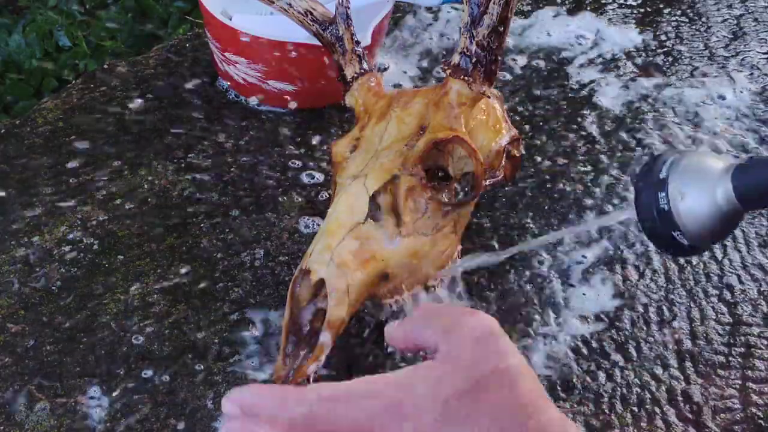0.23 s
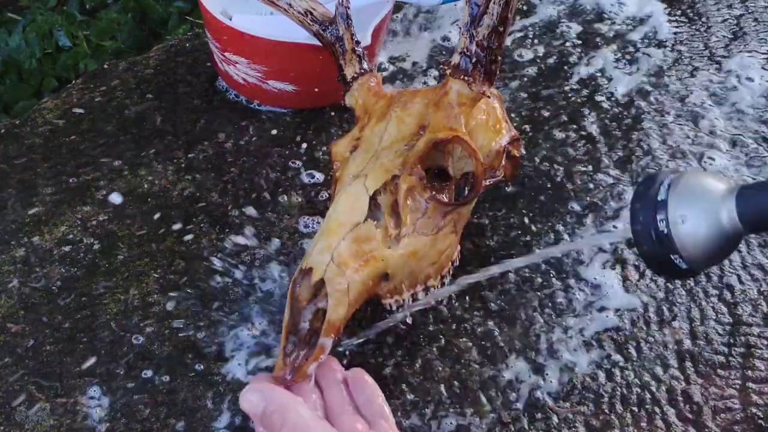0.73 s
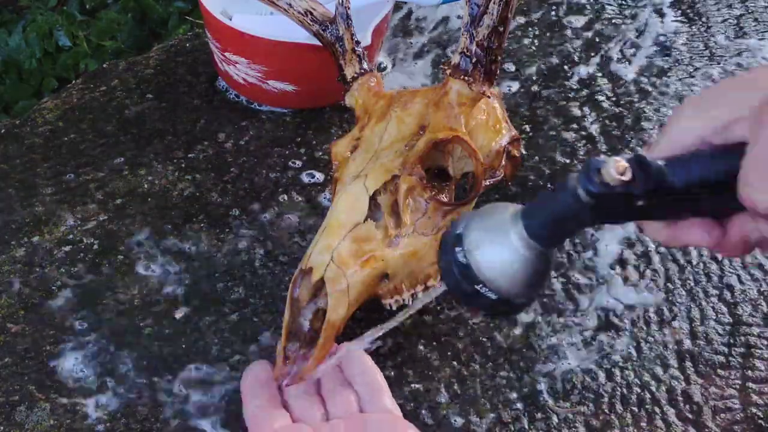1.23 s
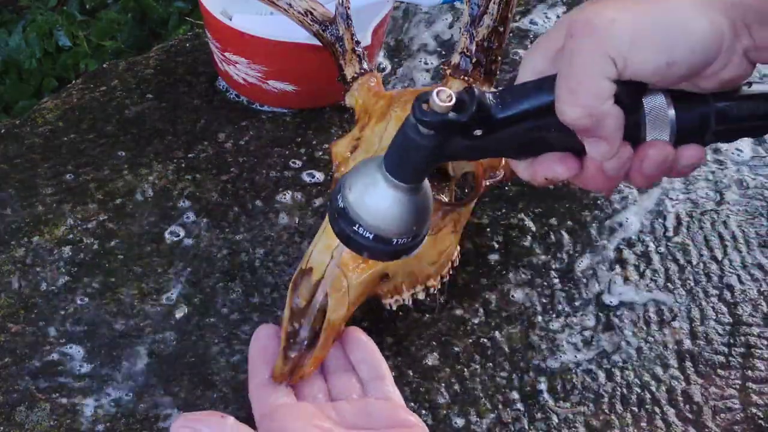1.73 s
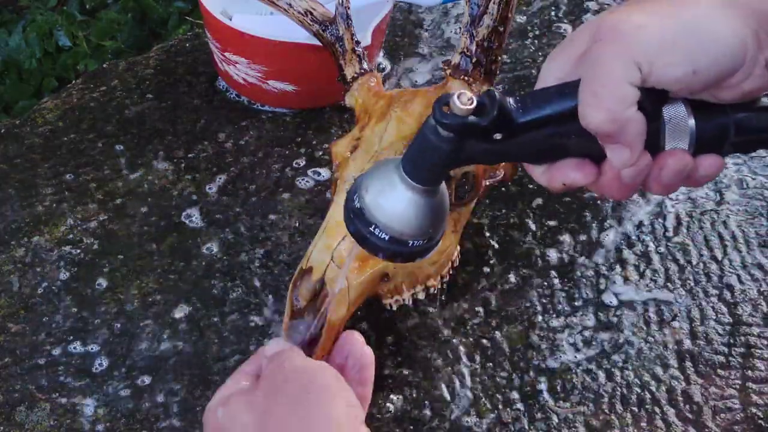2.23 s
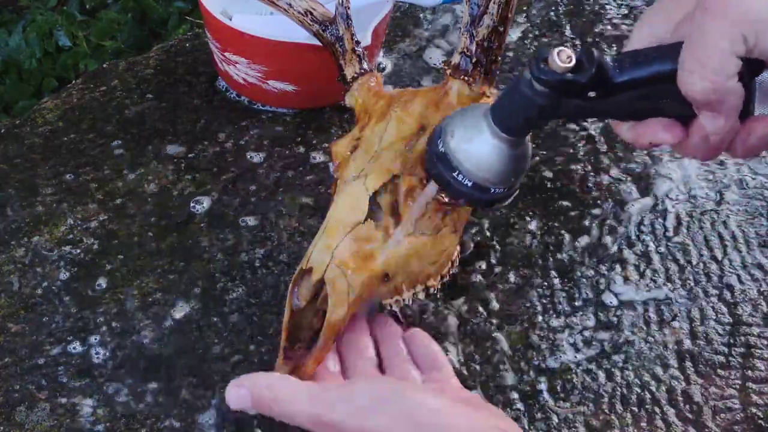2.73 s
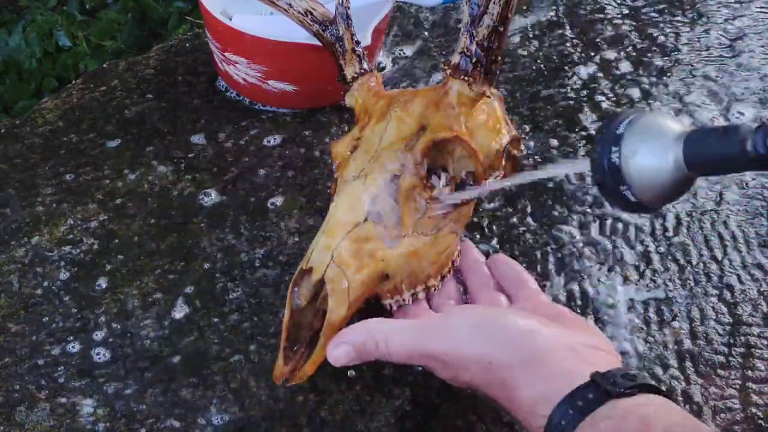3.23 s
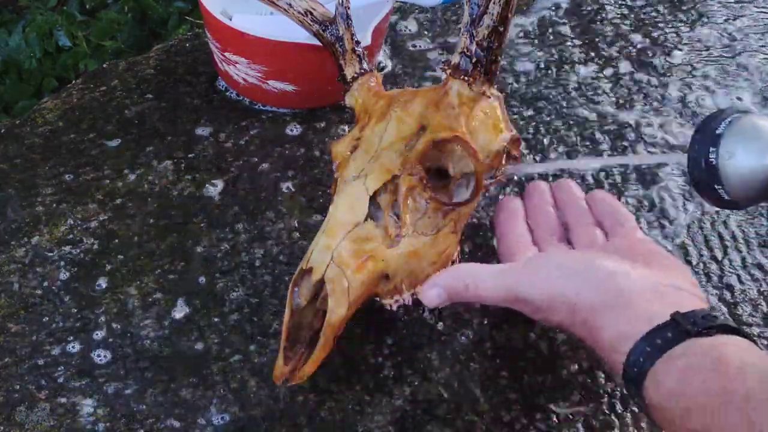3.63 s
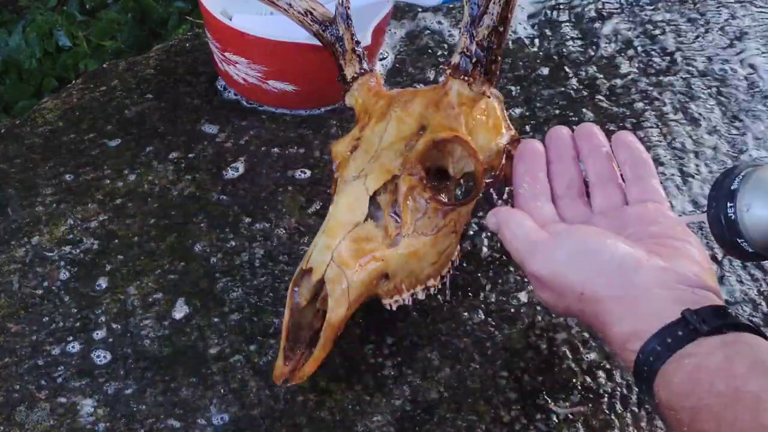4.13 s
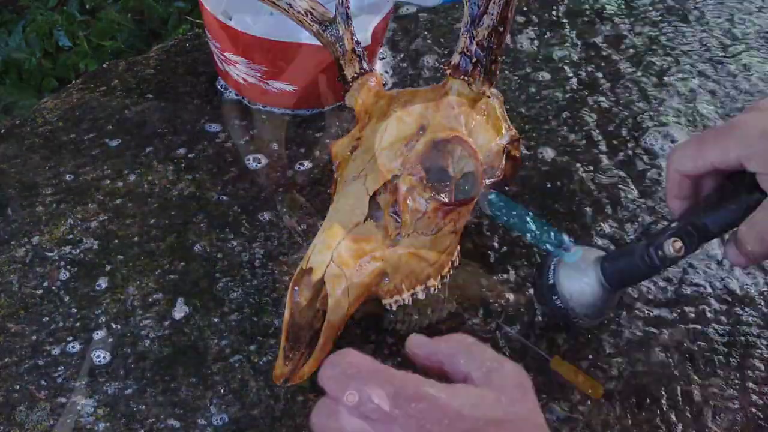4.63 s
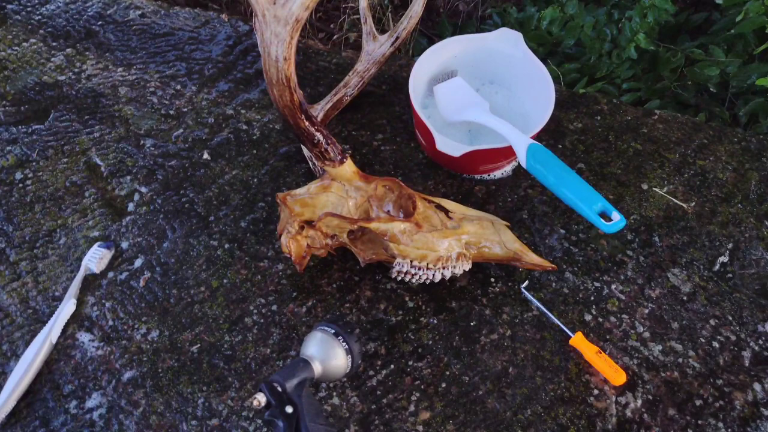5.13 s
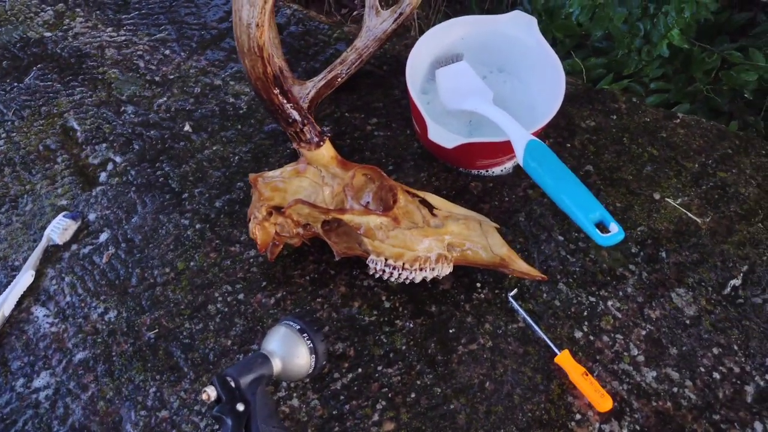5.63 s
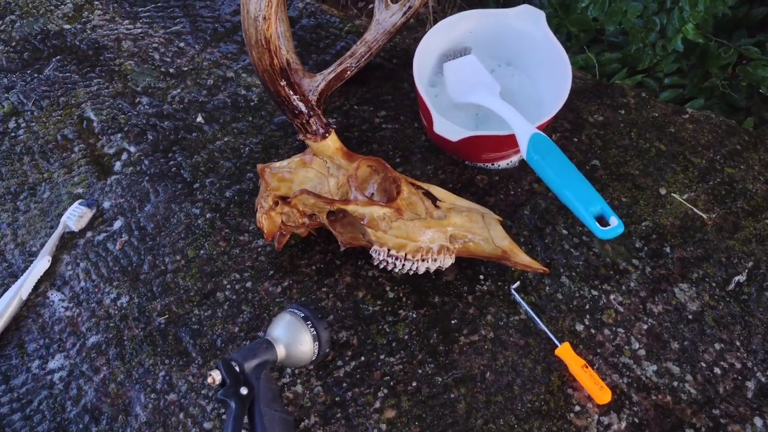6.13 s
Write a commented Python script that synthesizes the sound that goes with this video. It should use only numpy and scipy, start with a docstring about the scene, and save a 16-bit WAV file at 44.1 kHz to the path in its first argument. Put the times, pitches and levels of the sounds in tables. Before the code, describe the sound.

Close, fizzy water spray patters on concrete and an animal skull, surging now and then with small hollow gurgles and sharp drips. The spray grows briefly louder, thins and fades out a little past four seconds. A shrill chorus of cicadas then rises in the yard and carries on to the end, with faint knocks, rustling and low thumps from fingers on the microphone.

```python
"""In a yard, a hose jet rinses a deer skull on a concrete slab.
Drops hiss on the stone, slap the bone and drum in the skull's hollows; trapped air rings as bubbles.
The water fades out after four seconds and cicadas swell in the trees, their tymbals pulsing
their resonant bodies. Fingers on the hand-held microphone add soft bumps and a low rumble."""
import sys
import numpy as np
from scipy import signal
from scipy.fft import rfft, irfft
from scipy.io import wavfile
from scipy.ndimage import map_coordinates

SR = 44100
rng = np.random.default_rng(int(sys.argv[2]) if len(sys.argv) > 2 else 0)


def to_wav(s):
    """Save 16-bit WAV."""
    ch = np.atleast_2d(s).T  # columns
    pcm = np.round(np.clip(ch, -1, 1) * 32767)  # PCM
    wavfile.write(sys.argv[1], SR, pcm.astype(np.int16))


N = 281005
TIME = np.arange(N) / SR


def undb(db):
    """Decibels to gain."""
    return 10 ** (np.asarray(db) / 20)


def unit(x):
    """Scale to rms 1."""
    return x / np.sqrt(np.mean(x ** 2))


def curves(table):
    """One automation curve for each column after the time."""
    times, *columns = np.transpose(table)
    return [np.interp(TIME, times, column) for column in columns]


def panned(pan_db):
    """Stereo gains; pan is left minus right."""
    return undb(np.array([[.5], [-.5]]) * pan_db)


def walk(rate):
    """Random modulator with spread near 1 that turns rate times a second."""
    points = rng.standard_normal(N // 8)
    return np.sqrt(3 / 2) * np.interp(TIME * rate, np.arange(len(points)), points)


def swell(middle_s, length_s):
    """A bell envelope, peak 1, half as high at the ends of its length."""
    return .5 ** np.minimum((2 * (TIME - middle_s) / length_s) ** 2, 40)


def add(out, s, sound):
    """Mix a one-shot in at time s."""
    start = max(int(s * SR), 0)
    out[:, start:start + sound.shape[-1]] += sound[..., :max(N - start, 0)]


def equalise(x, points):
    """Minimum-phase EQ through points of (frequency [Hz], gain [dB])."""
    size = 2048
    hz, db = np.transpose(points)
    shape_db = np.interp(np.log(np.arange(size // 2 + 1) * SR / size + 1), np.log(hz), db)
    cepstrum = irfft(np.log(undb(shape_db)))
    cepstrum[1:size // 2] *= 2
    cepstrum[size // 2 + 1:] = 0
    impulse = irfft(np.exp(rfft(cepstrum)))
    return signal.oaconvolve(np.atleast_2d(x), impulse[None], axes=1)[:, :N]


def colour(x, points):
    """EQ a sound and scale it to rms 1."""
    return unit(equalise(x, points))


def resonate(x, hz, width):
    """One resonance, gain 1 at its centre."""
    return signal.lfilter(*signal.iirpeak(min(hz, SR * .45), hz / width, fs=SR), x)


def ring(x, modes):
    """A body with several resonances, at rms 1."""
    return unit(sum(undb(db) * resonate(x, hz, width) for hz, width, db in modes))


def delayed(x, lag_ms):
    """Delay one channel; the lag may move."""
    return map_coordinates(x, [np.arange(N) - lag_ms * SR / 1000], order=3)


def bounce(x, lag_ms, gain, sway_ms):
    """A hard surface adds an echo whose lag drifts at each ear and colours the sound."""
    echo = np.array([delayed(ear, lag_ms + sway_ms * walk(rate=2.5)) for ear in x])
    return (x + gain * echo) / np.hypot(1, gain)


def impacts(rate, spread_db, lag_ms, focus, clump_db):
    """Clumped clicks of random size; a share (focus) is centred, the rest lag between the ears."""
    hits = np.flatnonzero(rng.random(N) < rate / SR)
    size_db = spread_db * np.minimum(rng.exponential(size=N), 5) + clump_db * walk(rate=500)
    size = undb(size_db) * rng.choice([-1, 1], N)
    place = rng.standard_normal(N) * (rng.random(N) > focus)
    lag = np.round(place[hits] * lag_ms * SR / 1000).astype(int)
    return np.array([np.bincount(at, size[hits], N) for at in (hits, (hits + lag) % N)])


def burst(hz, width, decay_s):
    """A short crack of noise in a broad resonance, peak 1."""
    t = TIME[:2048]
    crack = resonate(rng.standard_normal((2, len(t))) * np.exp(-t / decay_s), hz, width)
    return crack / np.abs(crack).max(axis=1, keepdims=True)


def bubble(hz, t60, glide=0.063):
    """Trapped air rings and rises in pitch as it nears the surface."""
    t = np.arange(int(t60 * SR) + 2) / SR
    phase = 2 * np.pi * hz * (t + glide * t ** 2 / (2 * t60))
    return np.exp(-np.log(1000) * t / t60) * np.sin(phase)


# tone of the outdoor bed: (frequency [Hz], gain [dB])
AIR_EQ = [(30, -18.5), (100, 6), (250, -3.5), (500, -3), (900, -9), (1400, -8), (2400, -7.5), (6000, 0.5),
          (16000, -23)]
# fader of the far drone: (time [s], level [dB])
DRONE_FADER = [(5.3, -92), (5.6, -72), (6.0, -67), (6.37, -79)]
def yard():
    """A bed of still air, and a far drone that swells near the end."""
    air = colour(rng.standard_normal(N) + 0.95 * rng.standard_normal((2, N)), AIR_EQ)
    air *= undb(-62.5 + walk(rate=9.1))
    drone_eq = [(150, -25), (290, 2.5), (370, 4.5), (470, -14.5), (900, -37)]
    drone = colour(rng.standard_normal(N) + 0.14 * rng.standard_normal((2, N)), drone_eq)
    return air + drone * undb(curves(DRONE_FADER)[0])


# ride of the handling rumble: (time [s], relative level [dB], pan [dB])
RUMBLE_FADER = [(0, -76, 6), (.6, -89, 0), (1.25, -81.5, 1), (1.75, -69, -9), (2.05, -76.5, -6),
                (2.2, -70.5, 13), (2.75, -63.5, 0), (3.0, -73, -2), (3.7, -70.5, -1.5), (4.6, -85.5, 8),
                (5.1, -80, -6), (5.65, -69.5, -15), (6.37, -74.5, -1)]
# its bass-heavy tone: (frequency [Hz], gain [dB])
RUMBLE_EQ = [(20, -37), (45, -8), (75, 5.5), (120, -1), (200, -18), (400, -28), (1500, -66), (8000, -72)]
# rustle of the moving hand: (time [s], level [dB])
RUSTLE_FADER = [(4.93, -95), (5.04, -63.5), (5.12, -75), (5.3, -72), (5.42, -71.5), (5.75, -73.5),
                (6.1, -91)]
# soft thumps on the microphone: (time [s], level [dB], pitch [Hz], pan [dB])
BUMP_CUES = [(0.075, -48.5, 106, 23), (2.178, -53, 95, 26), (2.219, -53, 96, 16), (2.251, -51, 90, 14),
             (2.347, -51.5, 79, 22), (2.491, -49, 91, 18), (2.526, -49.5, 90, 10), (2.737, -48.5, 81, 18),
             (2.765, -49, 70, 15), (2.825, -51, 87, 10), (3.27, -55, 99, 17), (3.361, -46.5, 79.6, 17),
             (5.226, -45, 122, -24), (5.458, -50, 108, -25), (5.634, -55, 79, -15), (5.876, -55, 84, -20)]
def handling(attack_s=0.0062):
    """Fingers shift on the microphone's body: a rumble, a faint rustle and bumps of a few cycles."""
    rumble_db, rumble_pan = curves(RUMBLE_FADER)
    rumble = colour(rng.standard_normal((2, N)), RUMBLE_EQ)
    rumble *= undb(rumble_db + 6.5 + 2.8 * walk(rate=28)) * panned(rumble_pan)
    rub_eq = [(300, -11.5), (750, -7), (920, 1), (1150, -8), (2200, -8.5), (4000, -32), (12000, -48)]
    rub = colour(impacts(rate=1800, spread_db=3.5, lag_ms=0.17, focus=0.33, clump_db=0.5), rub_eq)
    out = rumble + rub * undb(curves(RUSTLE_FADER)[0] + 2 * walk(rate=36))
    t = TIME[:SR // 10]
    press = (t / attack_s * np.exp(1 - t / attack_s)) ** 2
    for s, db, hz, pan_db in BUMP_CUES:
        add(out, s, undb(db) * panned(pan_db) * press * np.sin(2 * np.pi * hz * t))
    return out


# taps and scuffs: (time [s], relative level [dB], centre [Hz], decay [s])
TAP_CUES = [(4.873, -60.5, 400, 0.0057), (5.022, -49, 1600, 0.0013), (5.146, -59, 1100, 0.0035),
            (5.202, -41, 950, .001), (5.314, -55, 780, 0.0058), (5.366, -54.5, 865, 0.0046),
            (5.572, -45, 695, 0.0013)]
def taps():
    """Light dull knocks near the microphone."""
    out = np.zeros((2, N))
    for s, db, hz, decay_s in TAP_CUES:
        knock = burst(hz, 1.2 * hz, decay_s)[0]
        add(out, s, undb(db + 3) * resonate(knock, hz, width=1.9 * hz))
    return out


def cicada(click_hz, depth, eq, modes, ring_db, flutter_db):
    """Buckling tymbals pulse the body's resonances; the trees smear the pulses into wide noise."""
    phase = 2 * np.pi * np.cumsum(click_hz * (1 + 0.0057 * walk(rate=3.7))) / SR
    pulses = rng.standard_normal((2, N)) * np.exp(depth * np.cos(phase))
    song = unit(colour(pulses, eq) + undb(ring_db) * colour(ring(pulses, modes), eq))
    return song * undb(flutter_db * walk(rate=40))


# balance of the cicadas: (time [s], far chorus [dB], shrill singer [dB], lower singer [dB])
CICADA_FADERS = [(4.4, -57, -61, -60), (4.67, -51.5, -52.5, -60), (4.92, -54, -47.5, -56.5),
                 (5.22, -51, -44, -53), (5.45, -54.5, -44, -47.5), (5.72, -53.5, -44, -46.5),
                 (5.95, -57, -47, -45.5), (6.2, -54, -46.5, -46), (6.37, -55, -46.5, -47.5)]
# broad tone of each voice: (frequency [Hz], gain [dB])
FAR_EQ = [(2500, -24.5), (4000, -17.5), (5000, -5.5), (6900, 0), (7300, 1), (7880, 3.5), (8050, -8.5),
          (8600, -6.5), (9000, -7), (9450, -5), (10200, -21.5), (12000, -19), (13000, -26), (16000, -31)]
SHRILL_EQ = [(2400, -36), (2850, -18.5), (3080, -17), (3350, -8.5), (3800, -26.5), (5850, -8), (6000, 2.5),
             (6570, -1), (6800, -5), (7600, -43.5)]
LOWER_EQ = [(1500, -42), (2500, -23), (2850, -4), (3100, -14), (3500, -4), (3880, -4), (4030, 1),
            (4300, 1.5), (4750, 0.5), (5350, 1), (5800, -4.5), (7000, -35)]
# sharp body resonances: (centre [Hz], width [Hz], gain [dB])
FAR_PEAKS = [(7406, 56, 0), (8040, 70, -1)]
SHRILL_PEAKS = [(6110, 27, -3), (6250, 7.6, 2), (6520, 85, -2.5), (6350, 60, -32)]
LOWER_PEAKS = [(3986, 45, -6.5), (4620, 45, -4), (4570, 41, -6), (4810, 35, -7), (4866, 49, 1.5),
               (5400, 57, -9), (5130, 69, -6)]
def cicadas():
    """A far chorus hisses; a shrill singer swells over it, then a lower one; a house wall echoes them."""
    far_db, shrill_db, lower_db = curves(CICADA_FADERS)
    far = cicada(click_hz=262, depth=0.068, eq=FAR_EQ, modes=FAR_PEAKS, ring_db=-8.5, flutter_db=0.44)
    shrill = cicada(click_hz=220, depth=0.24, eq=SHRILL_EQ, modes=SHRILL_PEAKS,
                    ring_db=-4, flutter_db=-0.5)
    lower = cicada(click_hz=175, depth=0.077, eq=LOWER_EQ, modes=LOWER_PEAKS, ring_db=-7, flutter_db=0)
    song = far * undb(far_db + 4.5) * panned(3.7)
    song += shrill * undb(shrill_db + 2) + lower * undb(lower_db + 1.5)
    fade_in = np.clip((TIME - 4.3) / 0.11, 0, 1)
    return fade_in * bounce(song, lag_ms=11.5, gain=0.42, sway_ms=0.027)


def swish(start_s=2.06, length_s=.125, from_hz=3100, to_hz=2250, db=-50, count=70):
    """The jet slides into a crevice and churns up ever larger bubbles: a short falling swish."""
    out = np.zeros((2, N))
    for along, (detune, size_db) in zip(rng.random(count), rng.standard_normal((count, 2))):
        hz = (from_hz + along * (to_hz - from_hz)) * np.exp(0.081 * detune)
        add(out, start_s + along * length_s, undb(db + size_db) * bubble(hz, t60=0.0082))
    return out


# trapped air and drips: (time [s], level [dB], pitch [Hz], 60 dB decay [s])
PLOP_CUES = [(.046, -45, 700, 0.055), (.056, -43, 599, 0.12), (.100, -39.5, 1000, .018),
             (.312, -47, 1750, 0.022), (.316, -39.5, 2120, 0.012), (.548, -48, 980, 0.048),
             (.811, -44.5, 950, .025), (.990, -45, 2030, .008), (3.490, -39.5, 627, 0.048),
             (3.562, -37, 650, 0.094), (3.574, -43, 552, 0.086), (3.589, -40.5, 775, 0.044),
             (3.773, -42, 3630, 0.029), (4.743, -50.5, 1530, .021)]
def plops():
    """Single air pockets pop in the hollows and puddles."""
    out = np.zeros((2, N))
    for s, db, hz, t60 in PLOP_CUES:
        add(out, s, undb(db) * bubble(hz, t60))
    return out


# bright close drops: (time [s], level [dB], centre [Hz], pan [dB])
SPLAT_CUES = [(.298, -28.5, 9800, 2), (0.306, -26, 11000, 3), (.325, -26.5, 8850, 1), (.789, -25, 14300, 0),
              (.820, -24, 13000, 1), (.821, -30, 6400, -8), (.854, -23, 15000, -12), (.855, -26.5, 6330, 3),
              (1.043, -29, 11000, -4), (1.240, -29, 15000, 1), (1.265, -25, 14600, -2),
              (1.5868, -26.5, 11200, 1), (1.607, -29, 8260, 2), (2.2125, -25.5, 14100, -6),
              (3.5417, -14, 11400, -4), (3.5743, -21, 8300, -6), (3.605, -17, 10200, 0),
              (3.839, -25, 10800, 0), (3.876, -26, 13000, 0), (4.0804, -26, 12300, -12.5)]
# midrange hits on the bone: (time [s], relative level [dB], centre [Hz])
SMACK_CUES = [(0.229, -42, 3770), (.3139, -42.5, 2100), (0.767, -43, 3280), (1.779, -41, 3630),
              (2.0873, -50, 2890), (3.256, -43, 2700), (3.419, -44, 3480), (3.513, -38, 1550),
              (3.5727, -33.5, 3820), (3.588, -40, 5600), (3.606, -36.5, 5670)]
def splats():
    """Single large drops burst on the slab; heavier slugs of water smack the bone."""
    out = np.zeros((2, N))
    for s, db, hz, pan_db in SPLAT_CUES:
        add(out, s, undb(db) * panned(pan_db) * burst(hz, width=1350, decay_s=0.0011))
    for s, db, hz in SMACK_CUES:
        smack = burst(hz, width=890, decay_s=0.0057)[0]
        add(out, s, undb(db) * resonate(smack, hz, width=3000))
    return out


# the nozzle's ring, louder when it is near: (time [s], level [dB])
NOZZLE_FADER = [(0, -70.5), (1.3, -70), (2.2, -72.5), (3.1, -62), (4.1, -65), (4.35, -74.5)]
def nozzle():
    """Running water makes the nozzle sing faintly."""
    flow = impacts(rate=8000, spread_db=-1.5, lag_ms=0.054, focus=0.42, clump_db=2.5)
    return unit(resonate(flow, hz=1422, width=55)) * undb(curves(NOZZLE_FADER)[0])


def fizz(low_hz, high_hz, cycles, spread_db, scatter_db, count):
    """Small bubbles ring all over the wet slab, each at its own pitch and place; rms 1."""
    out = np.zeros((2, N))
    for when, pitch, size, side in rng.random((count, 4)):
        hz = low_hz * (high_hz / low_hz) ** pitch
        db = -spread_db * np.log(max(size, np.exp(-4)))
        gains = undb(db) * panned(scatter_db * (2 * side - 1))
        add(out, when * N / SR, gains * bubble(hz, cycles / hz, glide=0.037))
    return unit(out)


def mist(spray_db):
    """The finest droplets come in spurts of airy sizzle."""
    droplets = impacts(rate=3000, spread_db=3.5, lag_ms=0.17, focus=0.32, clump_db=1.5)
    sizzle = colour(droplets, [(9000, -27), (12000, -5), (15000, 0)])
    return sizzle * undb(spray_db - 6.5 + 4 * walk(rate=18))


def shimmer(x, depth_db, rate):
    """The water film keeps changing shape, so each treble band swells on its own."""
    bands = (resonate(x, hz, width=2000) for hz in (5770, 9200, 12600, 12800))
    return unit(x + sum((undb(depth_db * walk(rate)) - 1) * band for band in bands))


# tone of the bright spray and the fuller splash: (frequency [Hz], gain [dB])
SPRAY_EQ = [(2500, -21.5), (5000, -5), (6200, -5), (7100, -9), (8000, -1), (9000, 2.5), (10500, 3),
            (12500, 2), (14000, 0.5), (15500, 3.5), (17000, -17.5)]
SPLASH_EQ = [(150, -22.5), (400, -4.5), (1000, -17), (2200, -6.5), (3300, 10), (4300, 2.5), (5300, -1),
             (7000, -5), (11000, -12)]
def slab_drops(spray_db, splash_db, flutter):
    """Fine drops hiss and coarse ones splash, echoed by the slab; strays tick near the microphone."""
    fine = impacts(rate=11000, spread_db=2.5, lag_ms=.16, focus=0.38, clump_db=1)
    spray = shimmer(colour(fine, SPRAY_EQ), depth_db=1.4, rate=18) * undb(spray_db + 3)
    coarse = impacts(rate=6400, spread_db=1.5, lag_ms=.16, focus=.45, clump_db=-0.1)
    splash = colour(coarse, SPLASH_EQ) * undb(splash_db + 3)
    hiss = bounce(spray + splash, lag_ms=1.3, gain=0.41, sway_ms=0.114)
    strays = impacts(rate=70, spread_db=3, lag_ms=.15, focus=.3, clump_db=0.5)
    return hiss * flutter + colour(strays, SPRAY_EQ) * undb(spray_db - 8)


# tone of water on bone: (frequency [Hz], gain [dB])
SLAP_EQ = [(300, -15), (700, -16), (1050, 3), (1800, 0), (2500, 1), (4500, -15)]
# air resonances of the eye socket and nose: (centre [Hz], width [Hz], gain [dB])
HOLLOW_PEAKS = [(553, 49, 5), (626, 115, 8), (815, 160, -0.5)]
def skull_drops(drum_db, slap_db):
    """Drops slap the bone and drum on the air in its hollows."""
    on_bone = impacts(rate=1800, spread_db=2.5, lag_ms=0.11, focus=0.57, clump_db=3)
    slap = colour(on_bone, SLAP_EQ) * undb(slap_db - 0.5)
    in_hollows = impacts(rate=900, spread_db=3, lag_ms=0.3, focus=0.5, clump_db=4)
    drum_eq = [(200, -26.5), (380, -7.5), (490, -0.5), (950, -1), (2500, -19.5)]
    return slap + colour(ring(in_hollows, HOLLOW_PEAKS), drum_eq) * undb(drum_db - 2.5)


# slow ride of the jet: (time [s], fine spray [dB], coarse splash [dB], slap on bone [dB])
JET_FADERS = [(0, -49, -60, -63), (.6, -47, -59.5, -64), (1.1, -47.5, -62, -73),
              (1.35, -48.5, -60.5, -66.5), (1.65, -49.5, -64.5, -69), (2.1, -50, -60, -68),
              (2.48, -50, -63, -68), (2.85, -49.5, -59.5, -64), (3.0, -47.5, -58.5, -60),
              (3.4, -48, -59.5, -61), (3.55, -42.5, -57, -54), (3.68, -44, -58, -59),
              (3.86, -45.5, -62, -64), (4.05, -47, -66, -70), (4.18, -49.5, -66, -74),
              (4.35, -51, -65, -78)]
# a sheet of water glances off an edge onto the slab: (middle [s], length [s], splash boost [dB])
SURGE_CUES = [(.31, .04, 2), (0.664, .07, 6), (0.778, 0.063, 6), (1.046, 0.023, 2), (1.325, 0.1, 4.5),
              (1.49, 0.04, 4), (1.803, 0.053, 5.5), (1.896, .09, 4), (2.295, 0.05, 4), (2.376, .04, 4),
              (2.59, 0.06, 1.5), (2.78, 0.033, 1.5), (2.904, 0.046, 5), (3.148, .04, 4.5), (3.25, 0.055, 4),
              (3.333, 0.033, 4), (3.48, 0.088, 3), (3.6, .04, 1.5), (3.827, 0.058, 4.5)]
# the jet catches in a hollow: (middle [s], length [s], drumming [dB], slap [dB])
GUSH_CUES = [(0.06, 0.031, -47, -57.5), (0.112, 0.081, -57, -63), (0.262, 0.087, -61, -70),
             (.347, 0.041, -52, -68), (0.544, 0.015, -51, -59), (.665, 0.071, -59.5, -56),
             (0.766, 0.082, -56.5, -60), (0.968, .035, -54.5, -60.5), (1.183, 0.064, -60, -62),
             (1.899, 0.027, -58.5, -67), (2.21, 0.066, -61.5, -63), (2.917, 0.075, -61, -56),
             (3.27, 0.054, -76, -57), (3.49, 0.075, -52.5, -69), (3.553, 0.05, -64, -48),
             (3.585, 0.029, -37, -46), (3.706, 0.056, -55, -62), (3.834, 0.099, -55, -66.5)]
def jet_levels(spray_share=0.58, slap_share=0.4):
    """Spray, splash, drumming and slap in dB: the jet's slow course with surges and gushes on top."""
    spray_db, splash_db, bone_db = curves(JET_FADERS)
    surge_db = sum(db * swell(s, length) for s, length, db in SURGE_CUES)
    bone_db += slap_share * surge_db
    slap = undb(bone_db)
    drum = undb(bone_db - 4.5)  # the hollows always answer a little to water on the bone
    for s, length, drum_db, slap_db in GUSH_CUES:
        gush = swell(s, length)
        drum = np.hypot(drum, undb(drum_db) * gush)
        slap = np.hypot(slap, undb(slap_db) * gush)
    return spray_db + spray_share * surge_db, splash_db + surge_db, 20 * np.log10(drum), 20 * np.log10(slap)


# where the jet lands in the stereo image: (time [s], left ear's lead [ms])
JET_POSITION = [(0, 0.0071), (1.4, 0.054), (2.7, .058), (3.5, 0), (3.85, -0.019), (4.1, -0.03)]
def aimed(x, pan_db_per_ms=26):
    """The nearer ear hears the jet sooner and louder."""
    lead_ms, = curves(JET_POSITION)
    return np.array([x[0], delayed(x[1], lead_ms)]) * panned(pan_db_per_ms * lead_ms)


# fade-out of the water: (time [s], gain [dB])
JET_FADE_OUT = [(4.345, -0.5), (4.375, -14), (4.5, -20), (5.0, -78)]
def hose_jet():
    """The jet breaks into drops; spray whips up tiny bubbles, water on the bone larger ones."""
    spray_db, splash_db, drum_db, slap_db = jet_levels()
    flutter = undb(0.5 * walk(rate=63) + 0.35 * walk(rate=17))
    patter = slab_drops(spray_db, splash_db, flutter) + skull_drops(drum_db, slap_db) * flutter
    froth = fizz(8200, 15500, cycles=90, spread_db=2.4, scatter_db=9, count=1600) * undb(spray_db - 9.5)
    gurgle = fizz(976, 3150, cycles=21, spread_db=2.5, scatter_db=29, count=800) * undb(slap_db - 5)
    water = patter + mist(spray_db) + froth + gurgle + nozzle()
    return aimed(water) * undb(curves(JET_FADE_OUT)[0])


def scene():
    """The mix: yard bed, handling noise, insects and water."""
    return yard() + handling() + taps() + cicadas() + swish() + plops() + splats() + hose_jet()


# tonal mismatch of the two microphone ports: (frequency [Hz], left minus right [dB])
PORT_EQ = [(600, -0.5), (1000, -3), (1400, 0), (3000, 0.5), (3700, -2.5), (4300, -0.5), (4800, 5),
           (6400, 3.5), (7200, 2), (9200, -2), (10200, 2), (12500, 0.5), (15500, 6)]
def record(dry, top_hz=15800):
    """Each port colours its side; the recorder cuts the top."""
    left = equalise(dry[0], [(hz, db / 2) for hz, db in PORT_EQ])
    right = equalise(dry[1], [(hz, -db / 2) for hz, db in PORT_EQ])
    high_cut = signal.ellip(10, .2, 70, top_hz, fs=SR, output="sos")
    return signal.sosfilt(high_cut, np.vstack([left, right]))


dry = scene()
out = record(dry)
to_wav(out)
```